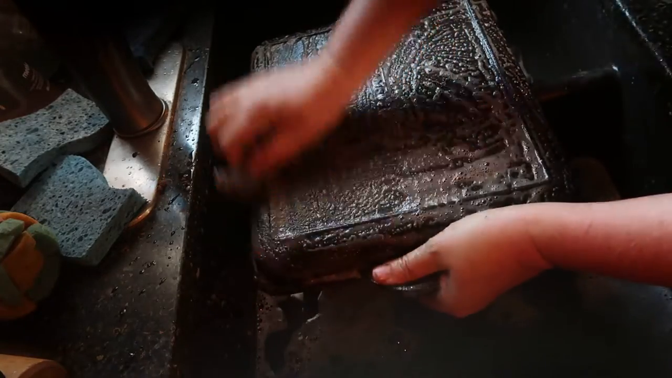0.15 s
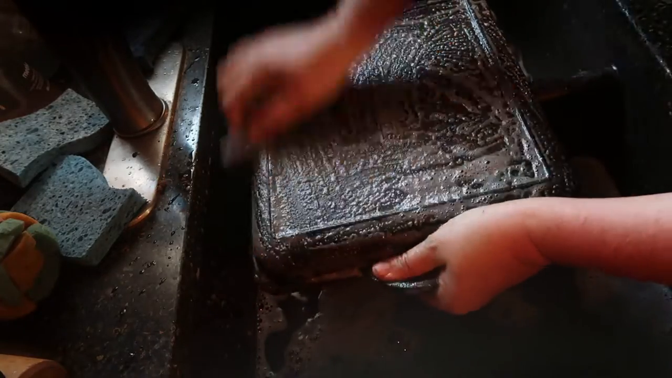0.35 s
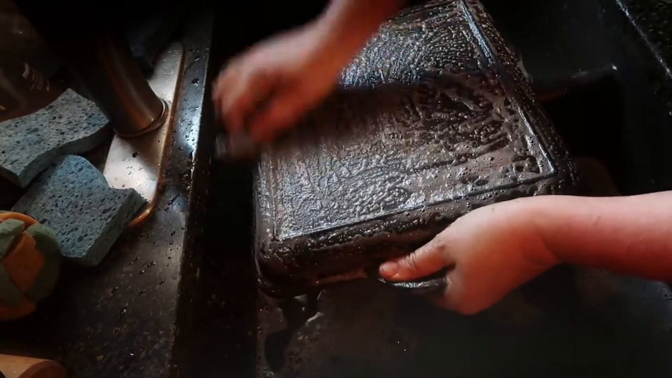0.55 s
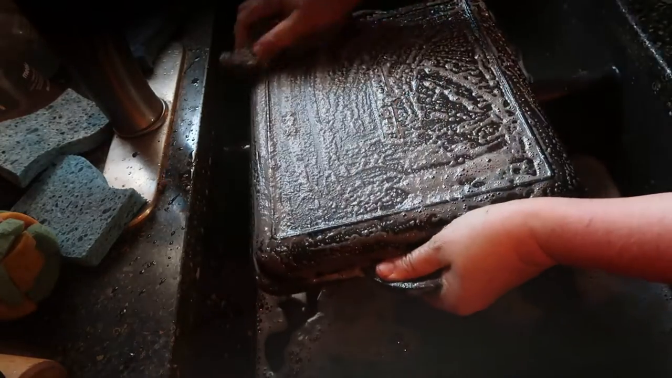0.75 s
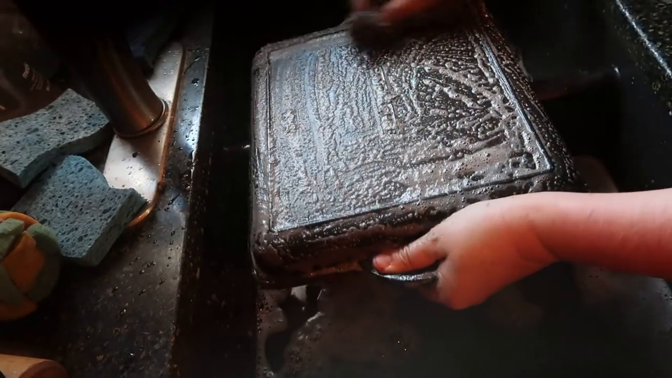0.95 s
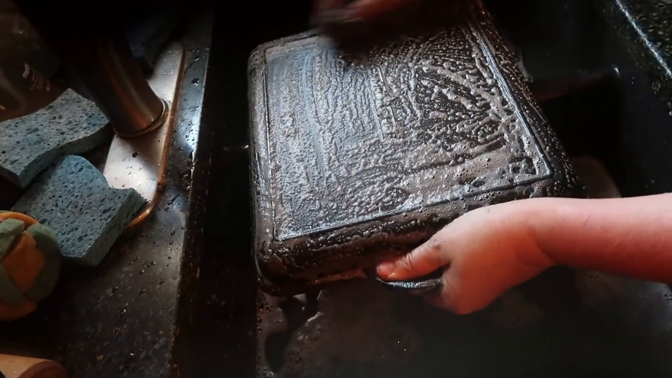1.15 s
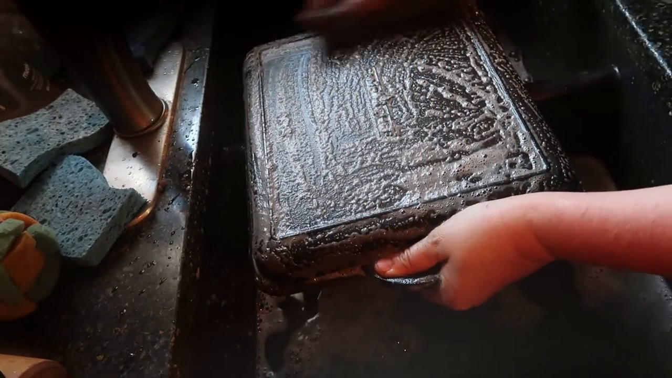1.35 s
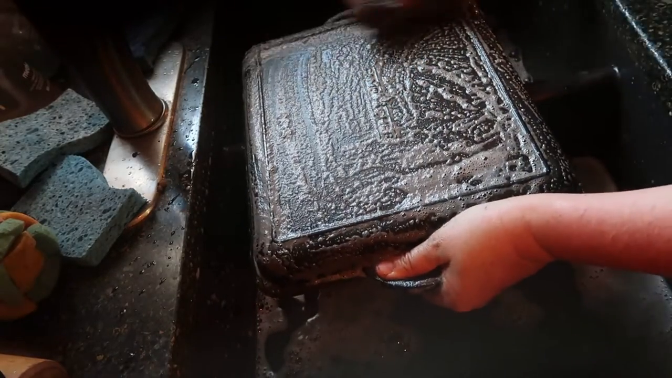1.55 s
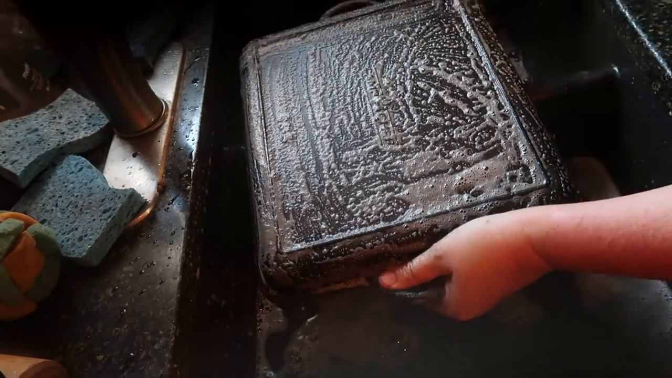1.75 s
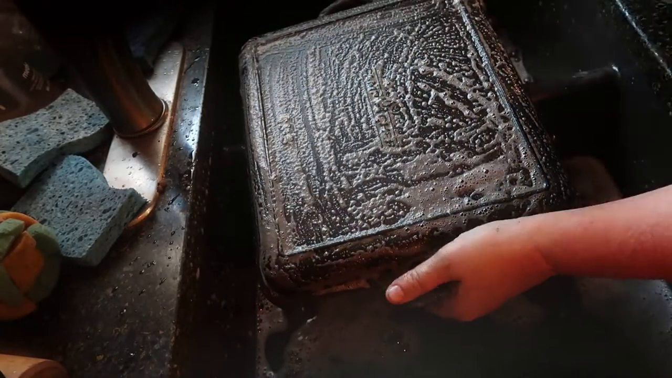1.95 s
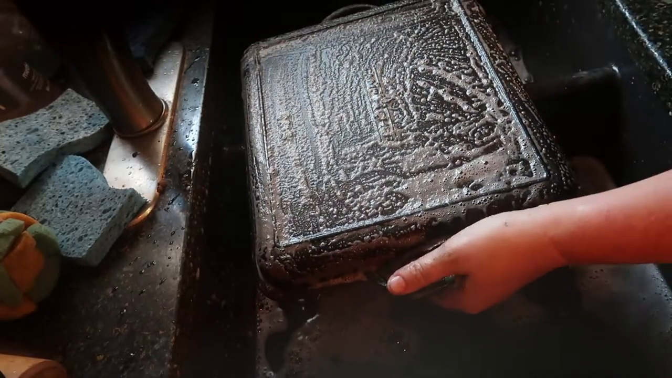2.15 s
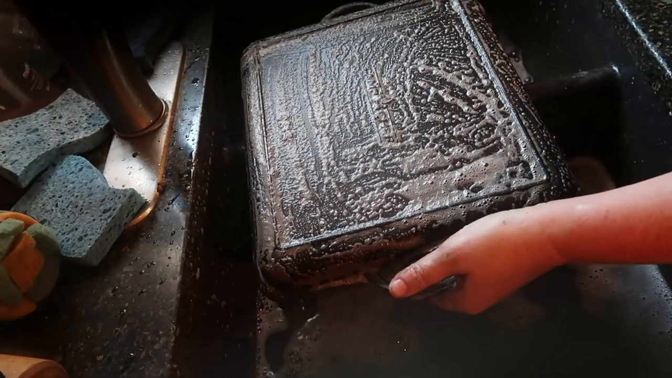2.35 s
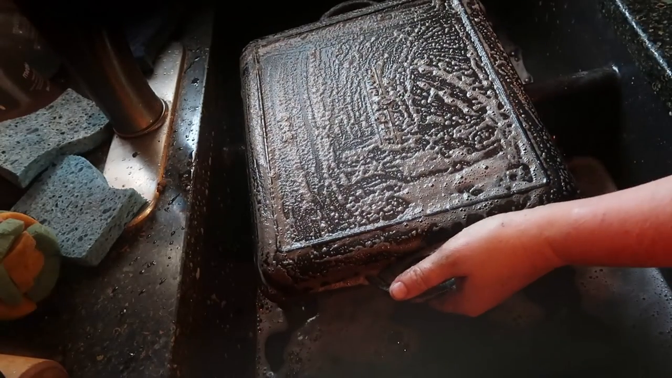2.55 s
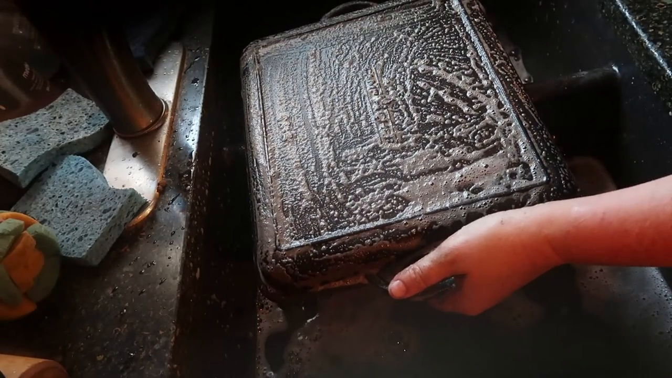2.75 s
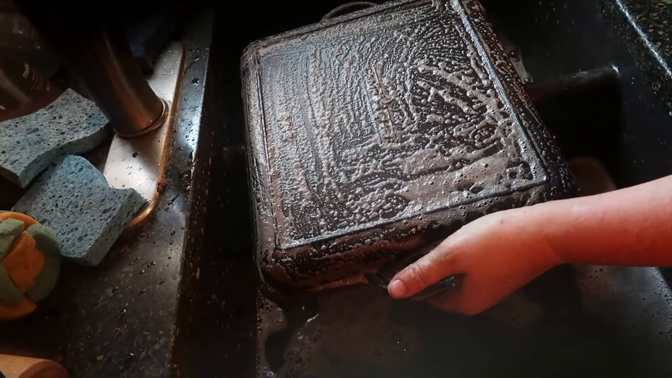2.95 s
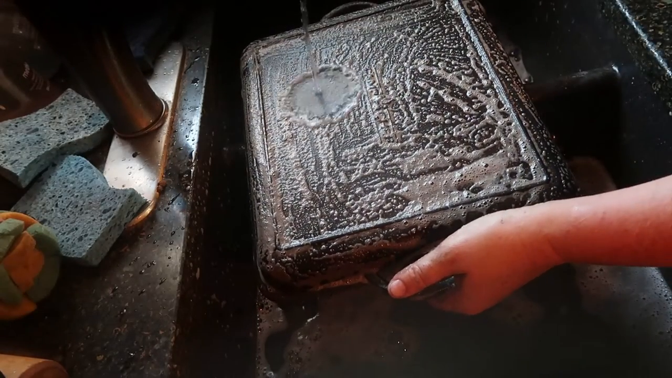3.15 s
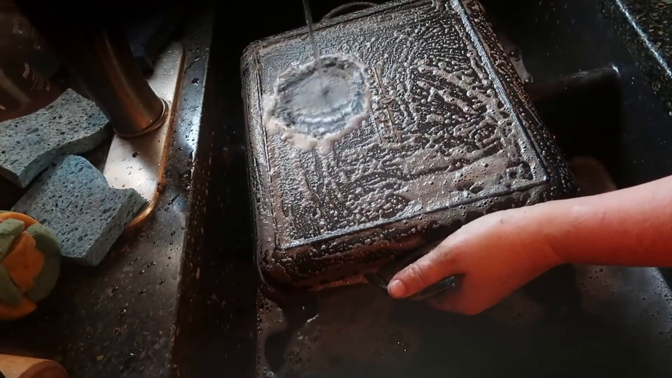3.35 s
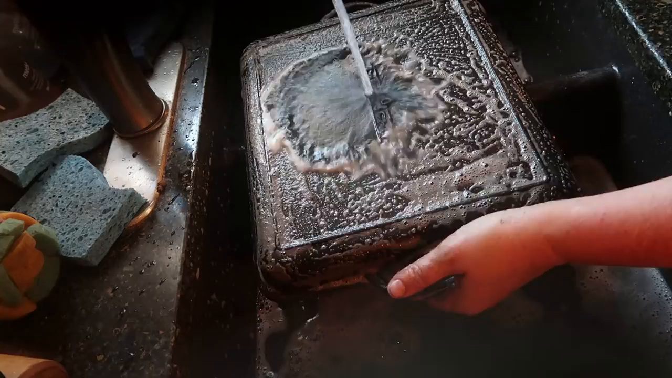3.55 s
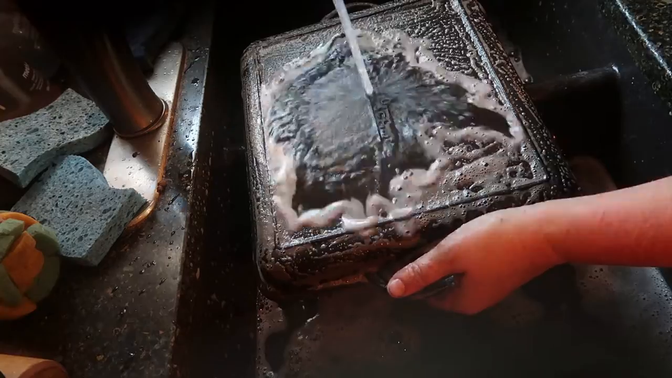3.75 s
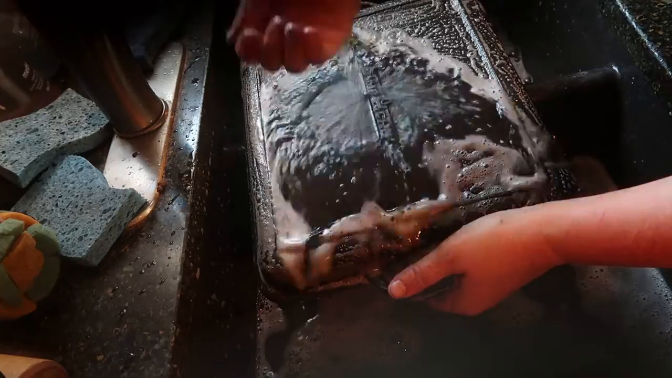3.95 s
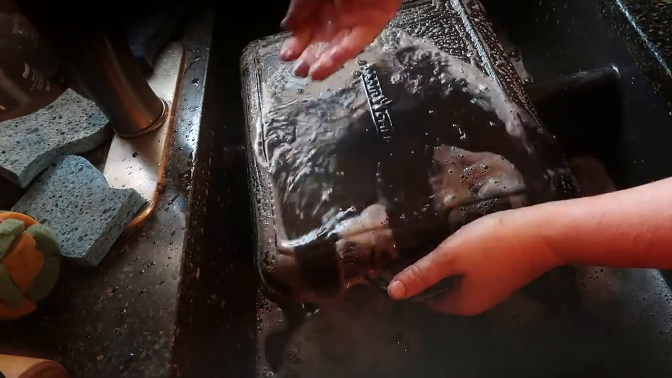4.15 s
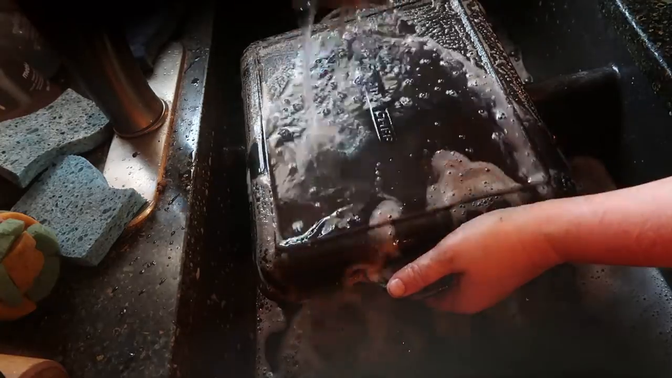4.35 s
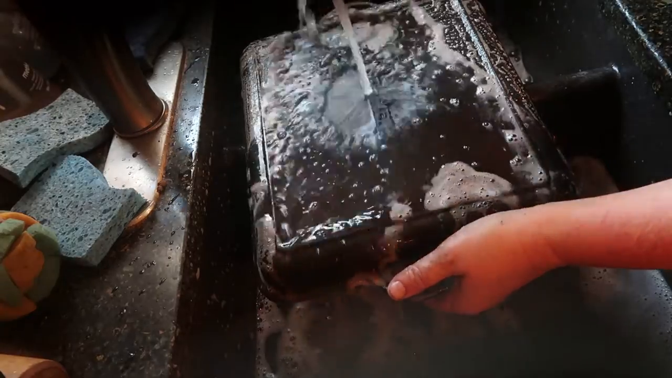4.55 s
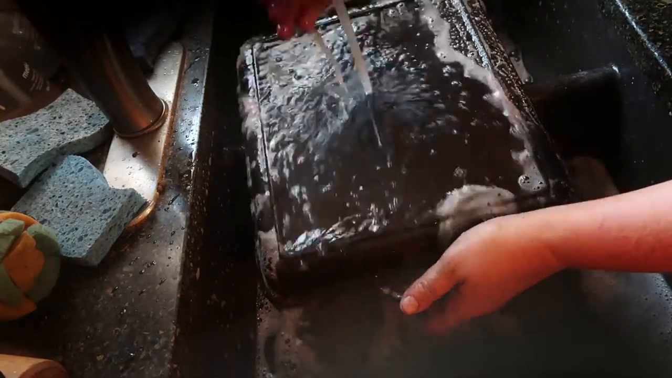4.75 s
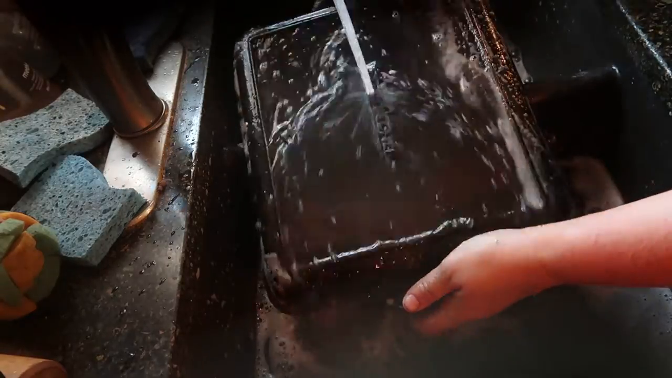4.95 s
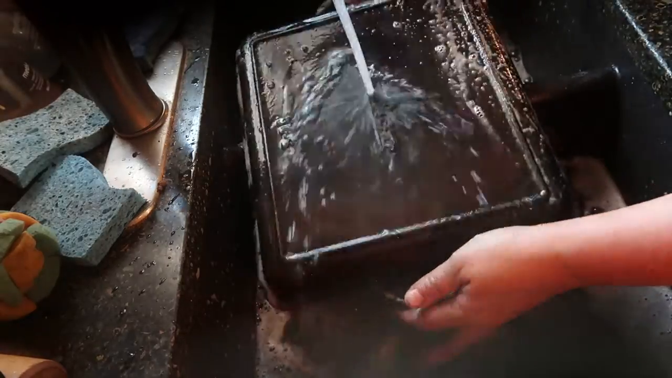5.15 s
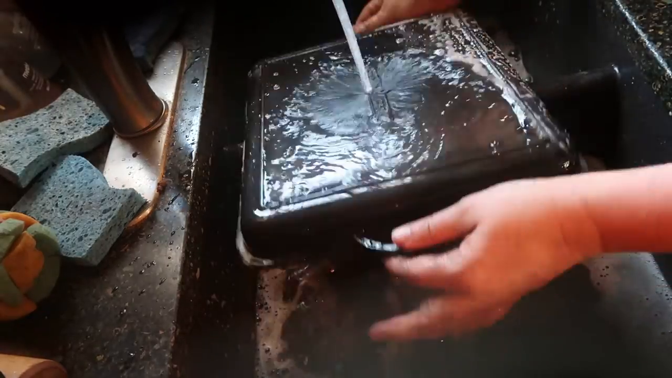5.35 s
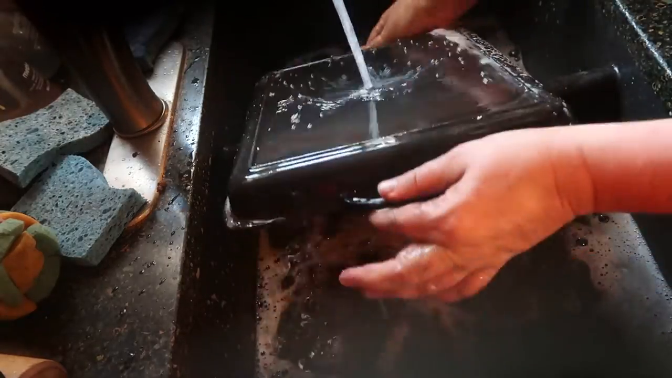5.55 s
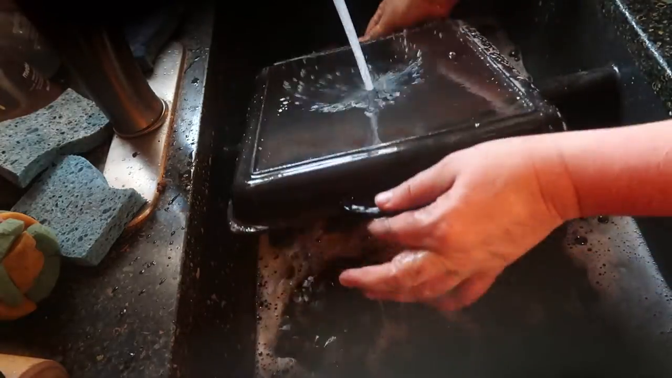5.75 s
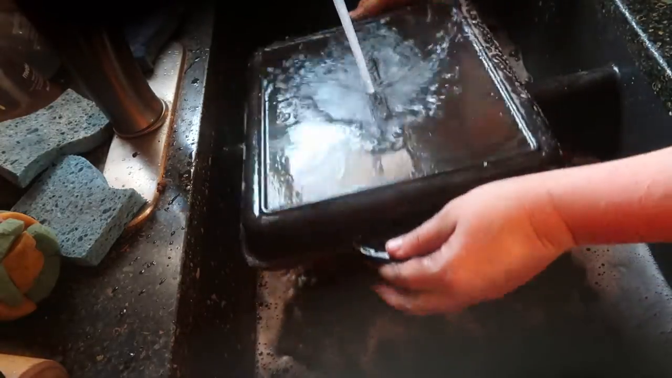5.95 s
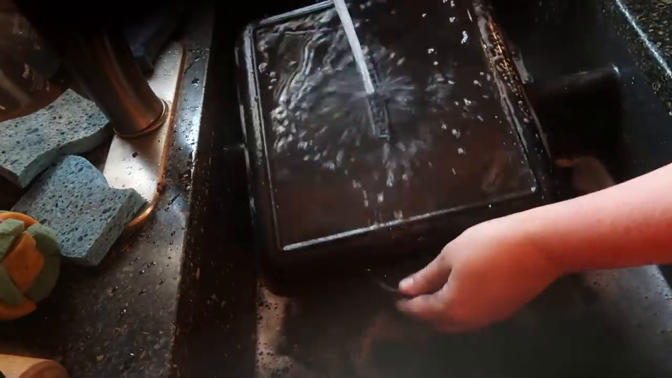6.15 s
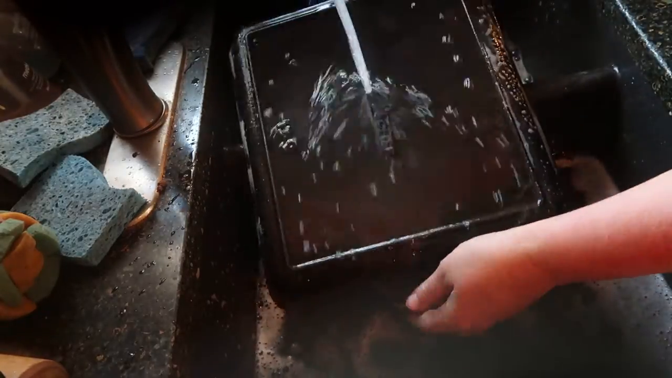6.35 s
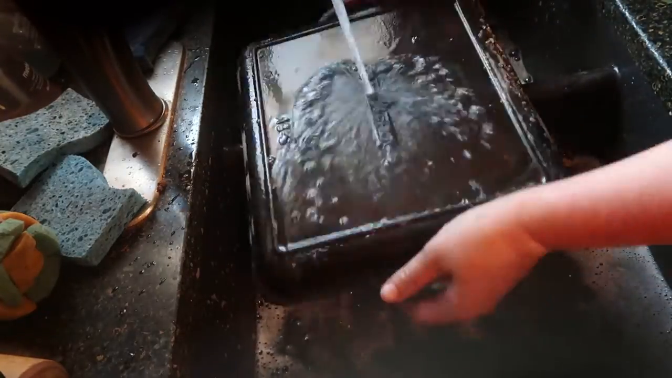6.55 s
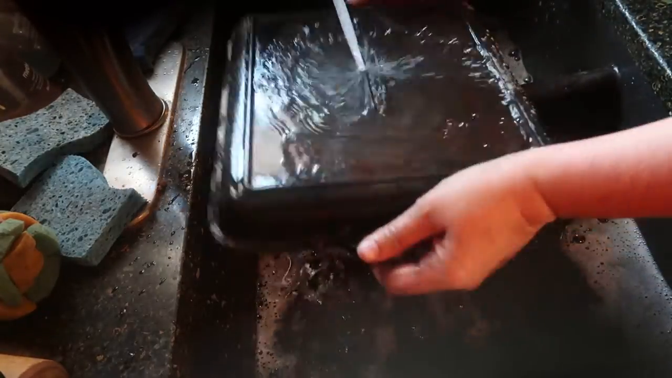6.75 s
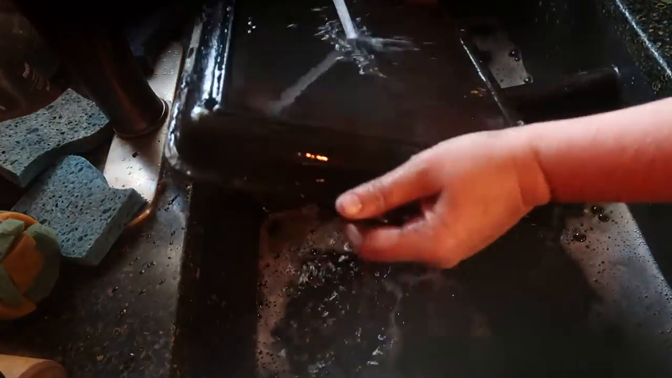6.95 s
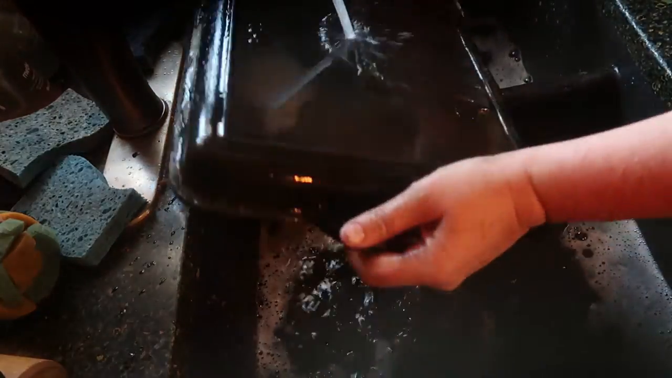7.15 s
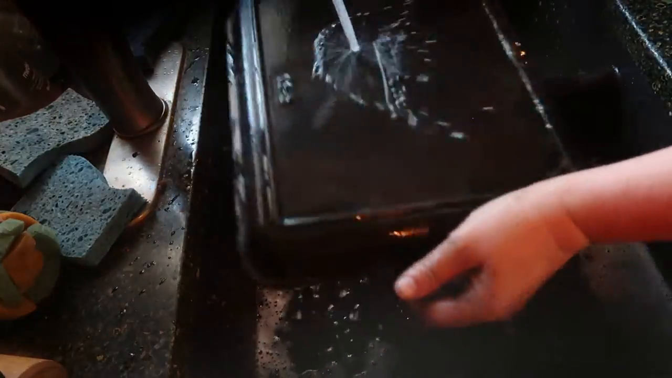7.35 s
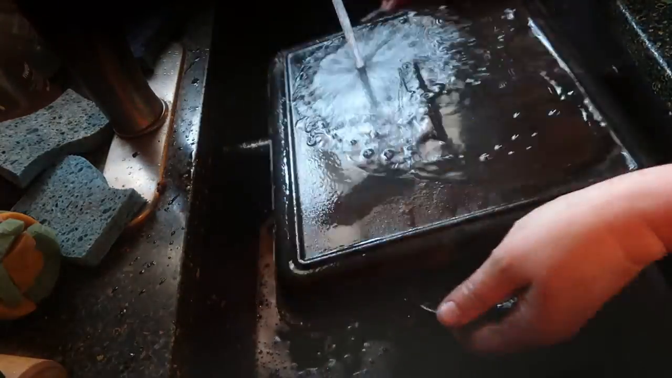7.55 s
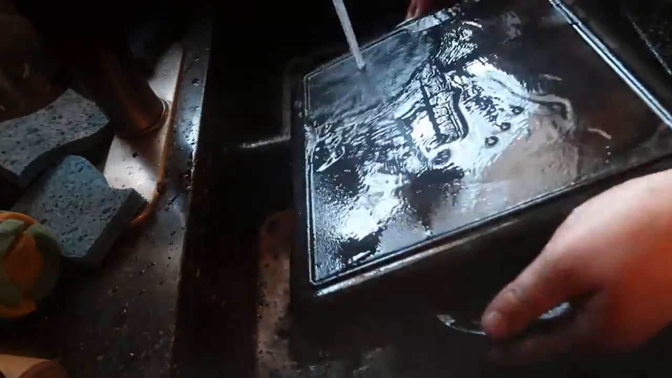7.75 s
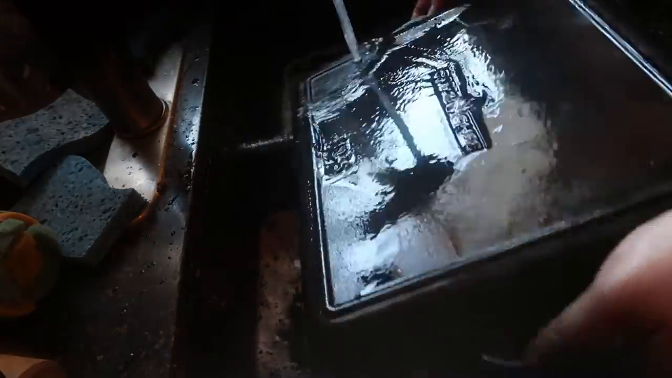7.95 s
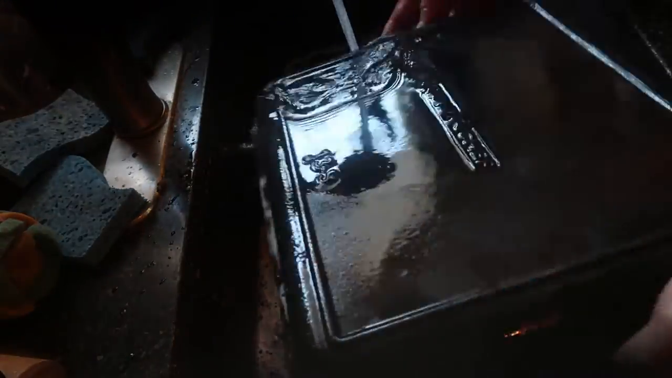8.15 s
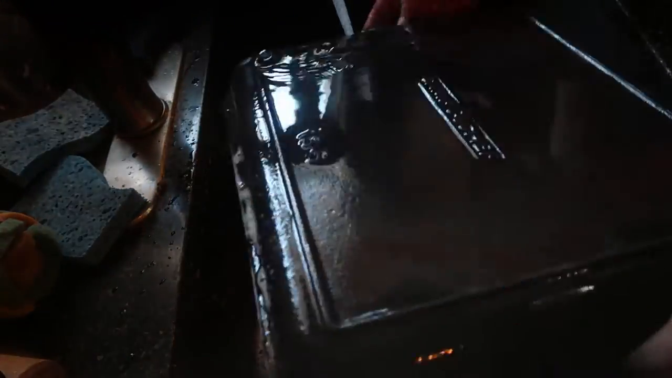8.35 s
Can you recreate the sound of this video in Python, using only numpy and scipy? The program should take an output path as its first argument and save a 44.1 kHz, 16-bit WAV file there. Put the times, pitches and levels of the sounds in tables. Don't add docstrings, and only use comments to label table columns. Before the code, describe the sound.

Quick metallic scrubbing and low grinding, a clattering drop into the basin, tap clicks, then water hissing, plopping and griddle knocks.

```python
import sys
import numpy as np
from scipy import signal
from scipy.fft import rfft, irfft
from scipy.io import wavfile

SR = 44100
rng = np.random.default_rng(int(sys.argv[2]) if len(sys.argv) > 2 else 0)


def dump(signal):
    limited = np.clip(np.atleast_2d(signal).T, -1, 1)
    pcm = np.round(limited * 32767).astype(np.int16)
    wavfile.write(sys.argv[1], SR, pcm)


def how_loud(loudness_db):
    steps = np.asarray(loudness_db, float) / 20
    return 10 ** steps


N = 374485
TIME = np.arange(N) / SR
HZ = np.maximum(np.arange(N // 2 + 1) * SR / N, 1)

# f/Hz, width/Hz, level/dB
GRIDDLE_MODES = [(1910, 130, -1.5), (2340, 66, -15.5), (3940, 49, 5.5), (4570, 30, 7), (4940, 49, -25.5),
                 (5170, 49, 3), (6300, 40, -7), (6500, 76, 4), (8030, 68, 2.5), (8580, 31, -17),
                 (9630, 39, -33), (11000, 110, -10)]


def rms_one(x):
    return x / np.sqrt(np.mean(x ** 2) + 1e-20)


def in_time(rows, column, outside=-120):
    rows = np.array(rows)
    return np.interp(TIME, rows[:, 0], rows[:, column], outside, outside)


def at_hz(points, hz):
    points = np.array(points)
    return np.interp(np.log(hz), np.log(points[:, 0]), points[:, 1])


def drift(rate):
    step, settle = 40, 2000
    r = np.exp(-2 * np.pi * rate * step / SR)
    noise = rng.standard_normal(N // step + settle + 2)
    slow = signal.lfilter([1], [1, -2 * r, r * r], noise)[settle:]
    return np.interp(np.arange(N) / step, np.arange(len(slow)), rms_one(slow))


def grit(per_s, spread_db):
    sizes = how_loud(spread_db * np.minimum(rng.exponential(1, N), 4))
    sizes = sizes * rng.choice([-1, 1], N)
    return rms_one(sizes * (rng.random(N) < per_s / SR))


def colour(x, spectrum, patchy_db=0., shared_db=0., rate=15.):
    whole = rfft(x) * how_loud(at_hz(spectrum, HZ))
    together = drift(rate)
    out = 0
    for centre in np.arange(9, 29):
        window = np.cos(np.pi / 2 * np.clip(2 * np.log2(HZ) - centre, -1, 1)) ** 2
        flicker_db = patchy_db * drift(rate) + shared_db * together
        out = out + irfft(whole * window, N) * how_loud(flicker_db)
    return rms_one(out)


def resonate(x, peaks, widen=0.41):
    out = 0
    for k, (hz, width_hz, level_db) in enumerate(peaks):
        r = np.exp(-np.pi * widen * width_hz / SR)
        poles = [1, -2 * r * np.cos(2 * np.pi * hz / SR), r * r]
        gain = (-1) ** k * how_loud(level_db) * (1 - r * r)
        out = out + gain * signal.lfilter([1, 0, -1], poles, x)
    return rms_one(out)


def add(out, s, sound):
    at = round(s * SR)
    out[at:at + len(sound)] += sound[:N - at]


def ring(hz, t60, rise_s, glide=0.):
    t = np.arange(round(1.3 * t60 * SR)) / SR
    tone = np.sin(2 * np.pi * hz * t * (1 + glide * t / t60))
    return tone * how_loud(-60 * t / t60) * (1 - np.exp(-t / rise_s))


def burst(low_hz, high_hz, t60):
    t = np.arange(round(t60 * SR)) / SR
    band = signal.butter(2, [low_hz, min(high_hz, .45 * SR)], "band", fs=SR, output="sos")
    return rms_one(signal.sosfilt(band, rng.standard_normal(len(t)))) * how_loud(-60 * t / t60)


def scouring():
    # t/s, level/dB, brightness/dB
    strokes = [(0.0, -34, -12), (0.086, -28, -6.5), (0.136, -39.5, -12), (0.23, -26, -3.5),
               (0.318, -26.5, -6), (0.35, -35.5, -7), (0.466, -21.5, -7.5), (0.554, -37.5, -9),
               (0.636, -22, -6), (0.812, -48, -8.5), (0.876, -27.5, -7), (1.02, -35.5, -4.5),
               (1.064, -29.5, -7.5), (1.294, -30, -6.5), (1.326, -40.5, -5), (1.404, -25.5, -10),
               (1.508, -27, -9), (1.53, -37, -8), (1.606, -27.5, -5.5), (1.76, -33.5, -5), (1.97, -65, -5)]
    # f/Hz, level per Hz/dB
    rasp_spectrum = [(290, -34), (500, -25), (595, -7), (972, -13), (1540, -3.5), (1940, -2.5), (3090, -10),
                     (4560, -11.5), (5580, -15), (14100, -23.5), (15800, -8)]
    catches = grit(9000, 1.63)
    rasp = colour(catches, rasp_spectrum, patchy_db=2.0, shared_db=-1.0, rate=18)
    rasp = rasp + how_loud(-19) * resonate(catches, GRIDDLE_MODES)
    top = signal.sosfilt(signal.butter(2, 4500, "high", fs=SR, output="sos"), rasp)
    bright_db = in_time(strokes, 2, 0) + 7
    return how_loud(in_time(strokes, 1) + 2.8) * (rasp + (how_loud(bright_db) - 1) * top)


def grinding():
    # t/s, boom level/dB, upper ring relative/dB
    spells = [
        [(0.0, -32, -4), (0.042, -23.5, -16), (0.136, -25, -15), (0.16, -37.5, -3), (0.394, -43.5, -11),
         (0.448, -22.5, -14), (0.53, -34, -2), (0.574, -20, -15), (0.672, -36.5, -15), (0.778, -38.5, -17),
         (0.818, -53, 1), (0.862, -38, -13), (1.028, -44.5, -4), (1.168, -34, -2), (1.252, -56, -2),
         (1.398, -22, -11), (1.554, -48.5, 0), (1.68, -44, -8), (1.75, -49, -1)],
        [(4.3, -50, 2), (4.328, -66, 14), (4.61, -48, 4), (4.684, -65, 13), (4.76, -51, -18), (4.826, -76, -6),
         (4.882, -41, -10), (5.018, -50, -2), (5.05, -51, -4)],
        [(5.55, -61, 0), (5.614, -34, -13), (5.82, -30, -13), (5.836, -22, -14), (5.856, -20, -23),
         (5.914, -35, -12), (6.1, -59, -2)],
        [(6.28, -45, -3), (6.376, -32.5, -8), (6.47, -32, -6), (6.544, -18, 0.5), (6.564, -34, -2),
         (6.72, -64, -9)],
        [(6.76, -61, -11), (6.804, -28, -1), (6.942, -23, 5.5), (7.036, -23, -5), (7.1, -44, -2),
         (7.14, -52, -11)],
        [(7.2, -55, -8), (7.212, -54, 11), (7.268, -24.5, -17), (7.33, -44, 3), (7.45, -62, 19)],
    ]
    # f/Hz, width/Hz, level/dB
    boom_modes = [(218, 97, 0)]
    # f/Hz, width/Hz, level/dB
    upper_modes = [(402, 62, 7), (615, 55, 9), (858, 24, -2), (1065, 37, -12), (1400, 17, -3),
                   (1950, 38, -7), (2060, 15, -18), (2350, 37, -8)]
    slips = grit(500, 2.65)
    boom = resonate(slips, boom_modes, widen=0.9)
    upper = resonate(slips, upper_modes, widen=0.76)
    out = np.zeros(N)
    for spell in spells:
        out += how_loud(in_time(spell, 1)) * (boom + how_loud(in_time(spell, 2, 0)) * upper)
    return out


def griddle_bumps():
    # t/s, peak level/dB, f/Hz, t60/s, upper f/Hz, upper level relative/dB
    bumps = [
        (0.031, -12, 176, 0.067, 589, -9),
        (0.059, -17, 240, 0.086, 436, 0),
        (0.562, -16, 155, 0.12, 600, -8),
        (4.873, -30, 145, 0.06, 538, -10),
        (5.842, -5, 238, 0.056, 327, -8),
        (6.53, 2, 187, 0.034, 490, 0),
        (7.254, -20.5, 158, 0.063, 620, -2),
    ]
    out = np.zeros(N)
    for s, db, hz, t60, upper_hz, upper_db in bumps:
        add(out, s, how_loud(db + 4.5) * ring(hz, t60, .0015))
        add(out, s, -how_loud(db + upper_db) * ring(upper_hz, 0.84 * t60, 0.002))
    return out


def dropped_scourer():
    # t/s, peak level/dB, crack relative/dB
    landings = [
        (1.994, -9.5, -8),
        (2.042, -8.5, -28),
        (2.106, -5.5, -31),
        (2.127, -18.5, -20),
        (2.149, -27.5, -27),
    ]
    # f/Hz, level/dB, t60/s
    basin_modes = [(642, 0.5, 0.064), (1157, -31, 0.6), (1237, -17, 0.84), (1437, -17, 0.18),
                   (1570, -13, 0.53), (1900, -17.5, 0.18), (2815, -22, 0.48), (4260, -24, 0.22),
                   (5250, -32, 0.19)]
    # f/Hz, level per Hz/dB
    tail_spectrum = [(120, -72), (200, -40), (259, -5.5), (531, -15), (641, -1.5), (843, -19), (2750, -19),
                     (3320, -29.5), (12000, -54), (15600, -94), (22000, -120)]
    out, tail_level = np.zeros(N), np.zeros(N)
    for s, db, crack_db in landings:
        for hz, mode_db, t60 in basin_modes:
            uneven_db = rng.normal(0, 1.7)
            add(out, s, how_loud(db + mode_db - 6.5 + uneven_db) * ring(hz, min(t60, .15), 0.0002))
        add(out, s, how_loud(db - 14.5) * burst(580, 2440, 0.096))
        add(out, s, how_loud(db + crack_db - 18) * burst(3000, 11000, 0.11))
        add(tail_level, s, how_loud(db - 20 - 60 * TIME[:SR // 2] / 0.38))
    return out + tail_level * colour(rng.standard_normal(N), tail_spectrum)


def tap_handle():
    # t/s, level/dB
    turns = [
        [(2.465, -67), (2.471, -39), (2.627, -34), (2.68, -63)],
        [(2.857, -57), (2.863, -29.5), (2.975, -33), (3.02, -52)],
        [(3.355, -45), (3.365, -27), (3.48, -39)],
    ]
    # f/Hz, level per Hz/dB
    rub_spectrum = [(88, -41), (150, -12), (411, -10), (532, -5), (796, -6), (938, -20), (1050, -7.5),
                    (1720, -23), (1920, -34), (2980, -23.5), (3580, -37), (5760, -33), (12000, -53),
                    (15600, -71), (22000, -120)]
    # t/s, peak level/dB, f/Hz, low knock relative/dB
    clicks = [(2.4703, -23, 2970, 0), (2.5844, -39, 3040, 3), (2.6155, -31, 2930, -3),
              (2.8619, -21, 2970, -3), (2.9856, -34, 1940, 6), (3.0495, -34, 3100, -3),
              (3.249, -25, 4090, -20), (3.3124, -35, 3600, -17), (3.3428, -22.5, 4740, -21),
              (3.3598, -19, 2970, -4), (3.3844, -26, 3630, -7)]
    # t/s, f/Hz, level/dB
    whistle = [
        (3.29, 3620, -63),
        (3.358, 3620, -43),
        (3.45, 3630, -54),
    ]
    rub_level = sum(how_loud(in_time(turn, 1)) for turn in turns)
    out = rub_level * colour(grit(1500, 2.4), rub_spectrum)
    for s, db, hz, low_db in clicks:
        add(out, s, how_loud(db - 10.5) * burst(2000, 7700, 0.037))
        add(out, s, how_loud(db - 11) * ring(hz, 0.048, 0.00025))
        add(out, s, how_loud(db + low_db - 4) * burst(370, 1530, 0.036))
    phase = 2 * np.pi * np.cumsum(in_time(whistle, 1, 3580)) / SR
    return out + how_loud(in_time(whistle, 2) + 2) * np.sin(phase)


def bubble_fizz():
    fizz = np.zeros(N)
    for when, pitch, size in rng.random((1300, 3)):
        hz = 900 * 8.0 ** pitch
        level = how_loud(-7 * np.log(size + 0.023))
        add(fizz, 3.5 + 4.95 * when, level * ring(hz, 22 / hz, 0.0004, glide=0.1))
    return rms_one(fizz)


def jet():
    # t/s, hiss level/dB, splash relative/dB
    flow = [(3.2, -75, 17), (3.26, -52, -19), (3.29, -65, -6), (3.32, -38, -19), (3.33, -53, -22),
            (3.36, -40, -9), (3.43, -41.5, -1), (3.46, -35.5, -8), (3.55, -39, 1), (3.73, -34, -11),
            (3.77, -35.5, -6), (4.02, -34, -4), (4.13, -40.5, 3), (4.27, -33, -2.5), (4.44, -37, 3),
            (4.6, -32, -4.5), (4.78, -35, -1.5), (4.79, -32.5, -5), (5.97, -33.5, 1.5), (6.43, -32.5, -4),
            (6.53, -35.5, 5.5), (6.56, -53, 2), (6.63, -42, -6), (6.75, -44, -1.5), (6.85, -37, 7.5),
            (7.0, -40.5, 9), (7.06, -41.5, 0.5), (7.29, -35.5, 1.5), (7.72, -33, 2), (7.74, -33, 8),
            (7.77, -31.5, -10), (7.84, -35.5, 1.5), (7.99, -31.5, -2), (8.19, -34.5, 2.5),
            (8.21, -32.5, 12), (8.31, -32.5, 0), (8.46, -30.5, -1), (8.49, -37, 7)]
    # f/Hz, level per Hz/dB
    hiss_spectrum = [(180, -35), (300, -13), (493, -22.5), (665, -4.5), (882, -17), (1060, -11),
                     (1150, -11.5), (2310, -7.5), (3320, -8), (4550, -4.5), (4950, -6.5), (13200, -14),
                     (15800, -9)]
    spray = grit(12000, 3.26)
    hiss = colour(spray, hiss_spectrum, patchy_db=2.5, shared_db=0.94, rate=25.7)
    hiss = hiss + how_loud(-25) * resonate(spray, GRIDDLE_MODES)
    splash = signal.sosfilt(signal.butter(2, 3000, fs=SR, output="sos"), hiss)
    hiss = hiss + (how_loud(in_time(flow, 2, 0) + 4.5) - 1) * splash
    return how_loud(in_time(flow, 1)) * (how_loud(0.5) * hiss + how_loud(-14.5) * bubble_fizz())


def run_off():
    # t/s, peak level/dB, f/Hz, ring/cycles
    plops = [(4.254, -21, 1300, 21), (4.48, -24, 640, 25), (5.015, -21, 1620, 25), (5.082, -26, 1270, 25),
             (5.223, -12.5, 2300, 18), (5.264, -24, 1390, 27), (5.319, -21, 1370, 43),
             (5.408, -16, 1990, 25), (5.428, -23, 1400, 25), (5.52, -24, 1270, 28), (5.54, -21.5, 1400, 30),
             (5.615, -17, 2450, 25), (5.632, -21, 1390, 28), (5.739, -20, 1750, 25), (5.815, -28, 560, 28),
             (5.958, -17, 2560, 30), (5.984, -19, 1750, 32), (6.008, -13, 1520, 27), (6.133, -20, 1770, 23),
             (6.257, -20, 1280, 35), (7.122, -24, 1910, 28), (7.14, -28, 1510, 25), (7.32, -26, 538, 42),
             (7.344, -22, 720, 59), (7.403, -22, 730, 43), (7.638, -19.5, 1340, 35),
             (7.732, -11.5, 2580, 50), (7.99, -17.5, 1760, 25), (8.069, -23, 1610, 25),
             (8.101, -18, 1800, 25), (8.143, -22, 673, 25), (8.203, -11.5, 673, 25), (8.224, -20, 664, 25),
             (8.254, -25, 684, 22), (8.294, -18, 980, 26), (8.34, -23.5, 1010, 37), (8.436, -20, 1830, 25),
             (8.456, -21, 1620, 25)]
    out = np.zeros(N)
    for s, db, hz, cycles in plops:
        add(out, s, how_loud(db + 3.5) * ring(hz, max(cycles, 5) / hz, 0.0015, glide=0.035))
        add(out, s, how_loud(db - 15) * burst(1030, 6000, 0.055))
    return out


def kitchen():
    # t/s, air level/dB, fridge hum level/dB
    background = [(0.0, -37, -47), (0.19, -43, -55), (0.45, -47, -52), (0.59, -40, -37), (0.99, -42, -52),
                  (2.51, -47, -46), (2.79, -47.5, -37), (3.03, -44.5, -49), (3.5, -43.5, -41),
                  (4.96, -47.5, -43), (5.13, -44, -48), (5.48, -44, -51), (5.86, -46, -46),
                  (6.46, -41, -47), (6.57, -37, -59), (6.83, -51.5, -63), (7.26, -46, -45),
                  (8.25, -45.5, -47), (8.39, -41.5, -57), (8.49, -48, -57)]
    # f/Hz, level per Hz/dB
    air_spectrum = [(12, -59), (20, -38), (42, -10), (65, -1.5), (85, -9), (158, -3.5), (254, -16),
                    (365, -10), (397, -19), (431, -7.5), (482, -11.5), (969, -21.5), (1050, -22),
                    (1280, -20), (15800, -43)]
    hum_hz = 59.7
    hum = np.sin(2 * np.pi * hum_hz * TIME + .5 * drift(2.5)) * how_loud(1.8 * drift(4.7))
    air = colour(rng.standard_normal(N), air_spectrum)
    return how_loud(in_time(background, 1)) * air + how_loud(in_time(background, 2) - 6.0) * hum


def stereo_pair(mid):
    # f/Hz, side minus mid level/dB
    width = [(60, -40), (110, -30), (200, -29.5), (380, -14), (700, -19), (1290, -19.5), (2380, -18),
             (4400, -4.5), (8120, -9.5), (15000, -16.5)]
    scatter = rfft(rng.standard_normal(600) * how_loud(-60 * TIME[:600] / 0.013), N)
    phases = scatter / np.abs(scatter)
    side = irfft(rfft(mid) * phases * how_loud(at_hz(width, HZ) - 1.2), N)
    return np.array([mid + side, mid - side])


def scene():
    griddle = scouring() + grinding() + griddle_bumps()
    tap = tap_handle() + jet() + run_off()
    return stereo_pair(griddle + dropped_scourer() + tap + kitchen())


def low_pass(x):
    return signal.sosfilt(signal.butter(12, 15950, fs=SR, output="sos"), x)


def record(dry):
    rounded = 1.312 * np.tanh(dry / 1.29)
    top_cut = signal.cheby2(12, 70, 15900, fs=SR, output="sos")
    return low_pass(signal.sosfilt(top_cut, rounded))


dry = scene()
out = record(dry)
dump(out)
```